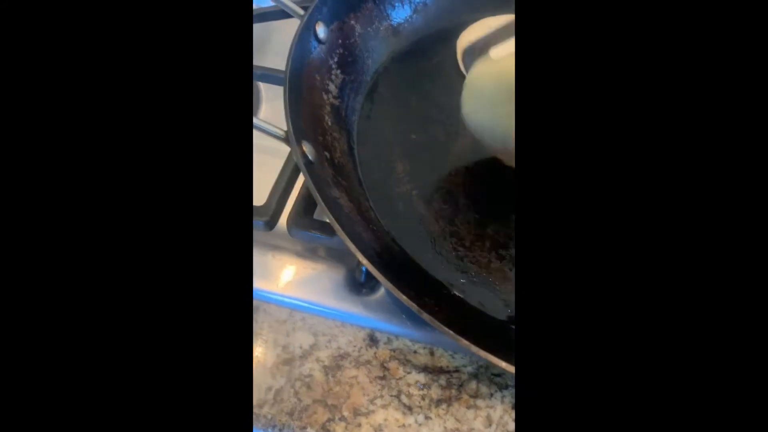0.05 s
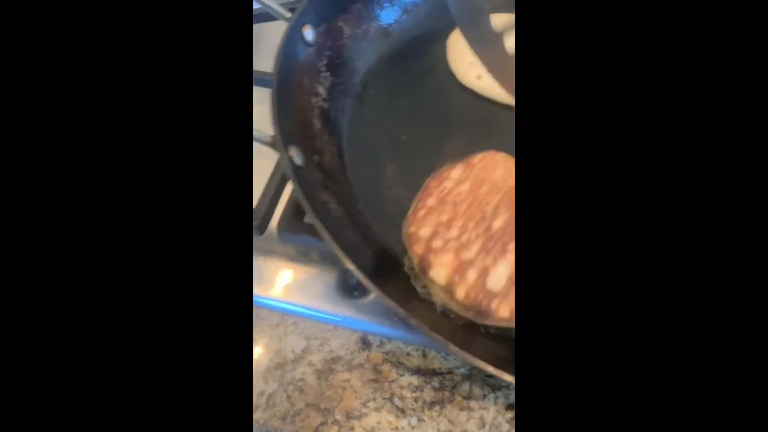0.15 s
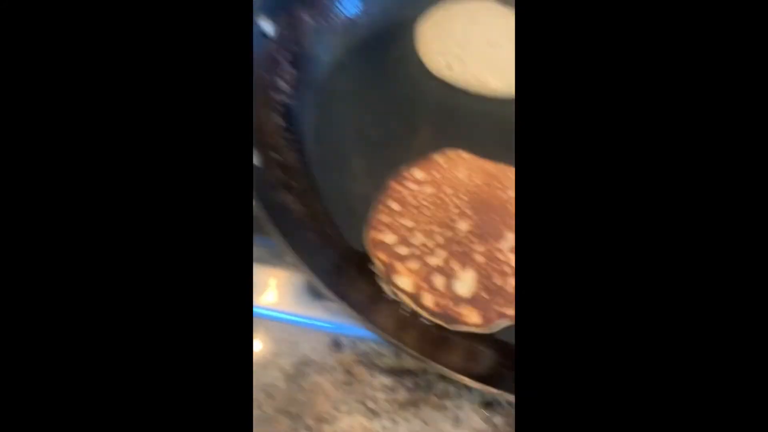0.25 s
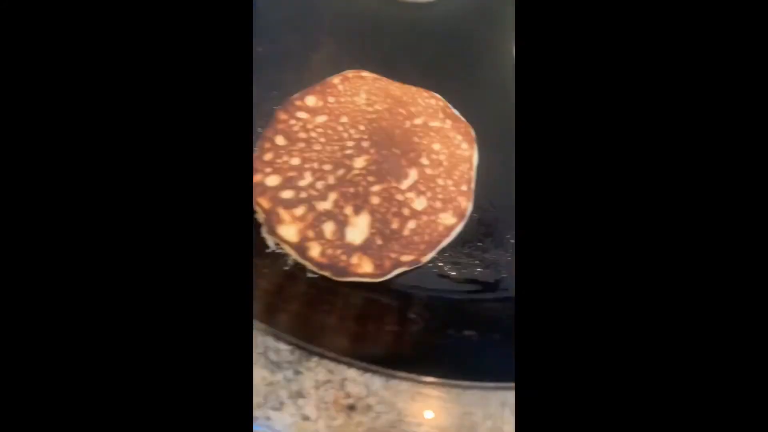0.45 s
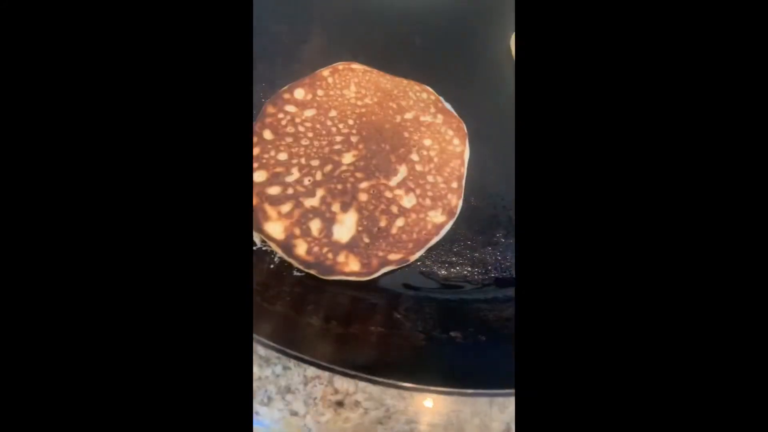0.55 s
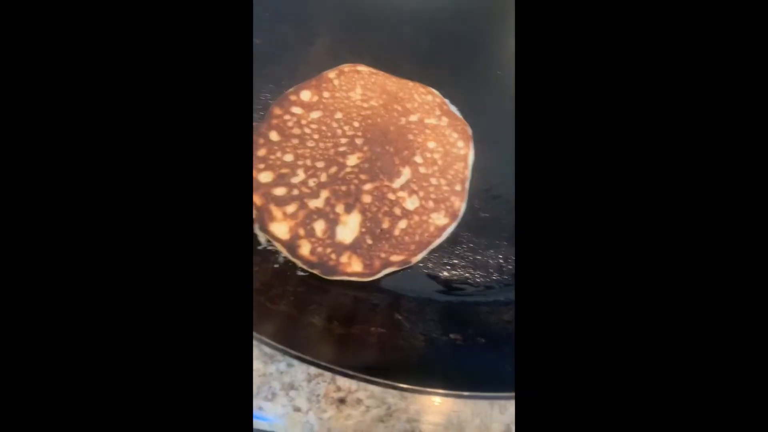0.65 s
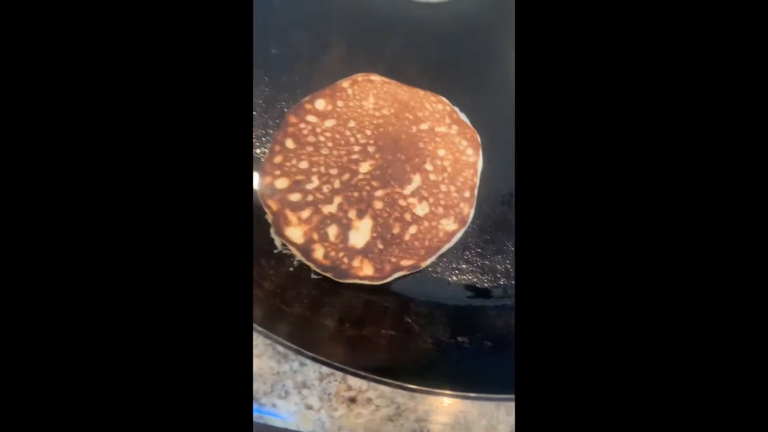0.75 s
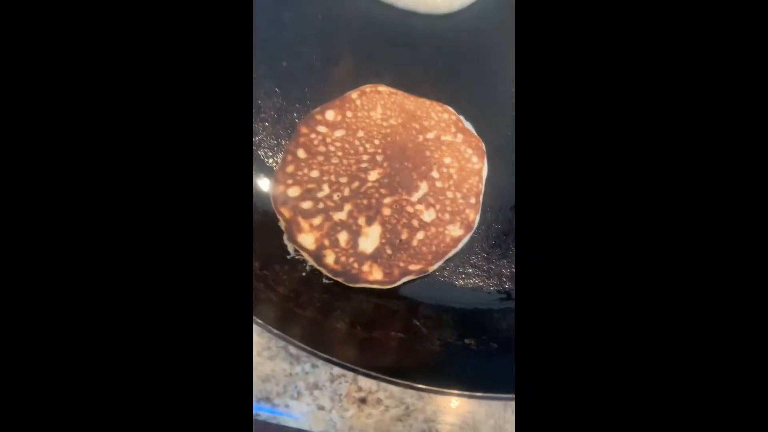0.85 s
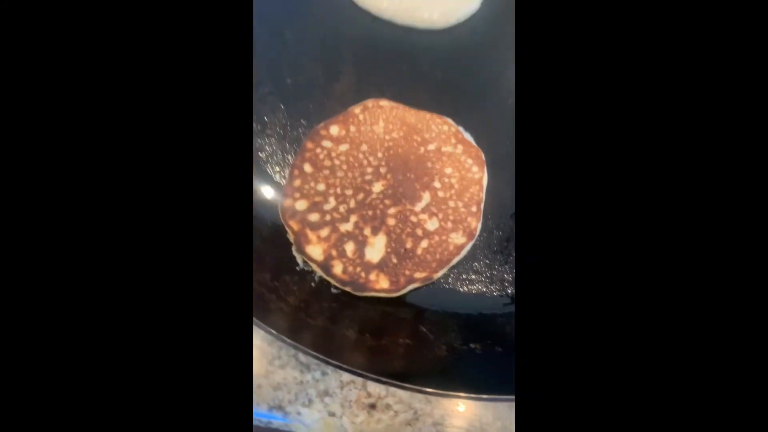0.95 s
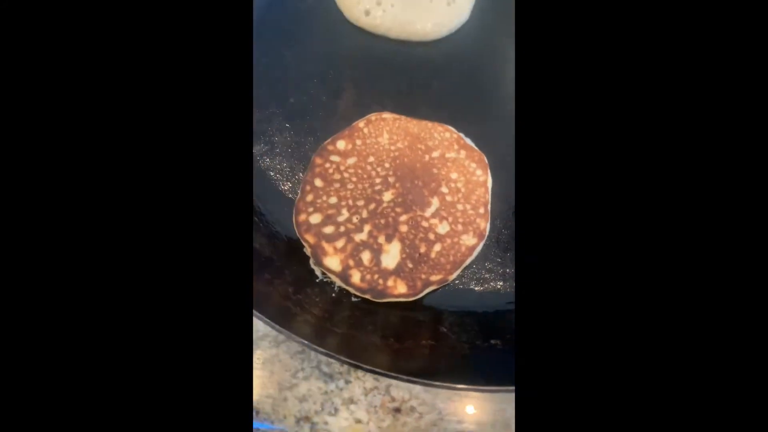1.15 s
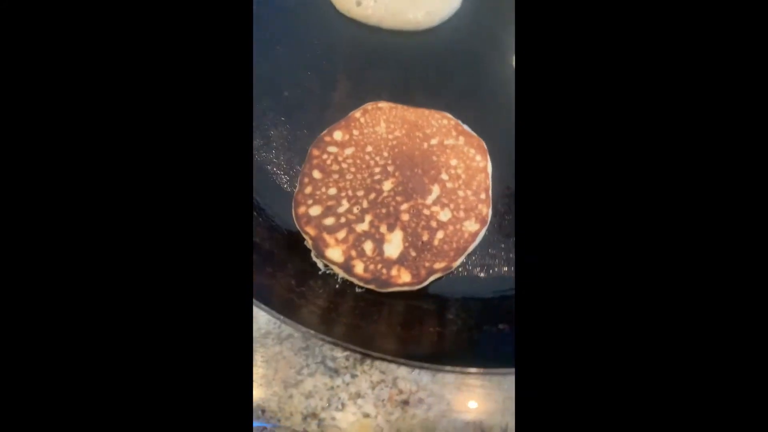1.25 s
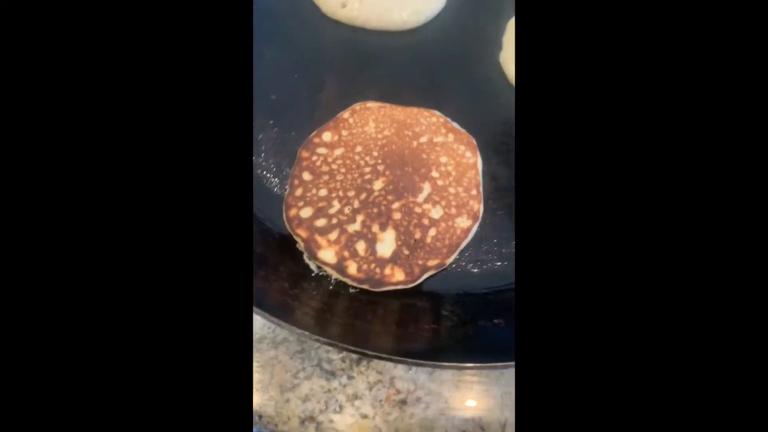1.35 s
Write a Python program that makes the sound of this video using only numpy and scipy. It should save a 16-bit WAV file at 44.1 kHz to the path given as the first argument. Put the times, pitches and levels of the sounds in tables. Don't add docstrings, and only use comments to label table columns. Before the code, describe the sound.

A spatula clacks sharply on a steel pan as a pancake flips and softly lands, fat sizzling

```python
import sys
import numpy as np
from scipy import signal
from scipy.fft import rfft, irfft
from scipy.io import wavfile
from scipy.ndimage import uniform_filter1d

SR = 44100
rng = np.random.default_rng(int(sys.argv[2]) if len(sys.argv) > 2 else 0)


def waveform_to_disk(signal):
    frames = np.transpose(np.atleast_2d(signal))
    scaled = np.clip(frames, -1, 1) * 32767
    samples = np.round(scaled).astype(np.int16)
    wavfile.write(sys.argv[1], SR, samples)


def level_to_linear(level):
    exponent = np.asarray(level, float) / 20
    return 10 ** exponent


N = 61739
T = np.arange(N) / SR
HZ = np.fft.rfftfreq(N, 1 / SR)
BLOW_S = .2472


def evened(x):
    return x / np.sqrt(np.mean(x ** 2) + 1e-20)


def read(points, hz):
    f, value = np.transpose(points)
    return np.interp(np.log(hz + 1), np.log(f + 1), value)


def curve(rows):
    return np.interp(T, *np.transpose(rows))


def add(mix, s, sound):
    part = mix[round(s * SR):][:len(sound)]
    part += sound[:len(part)]


def resonate(x, hz, width_hz):
    r = np.exp(-np.pi * width_hz / SR)
    pole = r * np.exp(2j * np.pi * hz / SR)
    return 2 * signal.lfilter([1 - r], [1, -pole], x).real


def highpass(x, hz):
    return signal.sosfilt(signal.butter(2, hz, "high", fs=SR, output="sos"), x)


def coloured(x, gain):
    return irfft(rfft(x) * gain, len(x))


def clicks(per_s, spread_db):
    size = level_to_linear(spread_db * np.minimum(rng.exponential(1, N), 4))
    sign = rng.choice([-1., 1.], N)
    return size * sign * (rng.random(N) < per_s / SR)


# frequency in Hz, level in dB per Hz.
AIR = [(20, -3.5), (60, -1.5), (100, -5), (170, -9), (480, -14), (800, -19.5), (1500, -22), (4000, -29.5)]
AIR_DB, HUM_DB = -55.5, -60
HUM_HZ, HUM_WIDTH_HZ = 122.4, 10.2


def kitchen():
    air = coloured(rng.standard_normal(N), level_to_linear(read(AIR, HZ)) * (HZ < 6000))
    waver = evened(resonate(rng.standard_normal(N), HUM_HZ, HUM_WIDTH_HZ))
    hum = np.sin(2 * np.pi * HUM_HZ * T) + 0.83 * waver
    return level_to_linear(AIR_DB) * evened(air), level_to_linear(HUM_DB) * hum


WALL_DB, WALL_T60_S = -19.5, 0.31


def walls(x):
    t = np.arange(6000) / SR
    tail = rng.standard_normal(6000) * level_to_linear(-60 * t / WALL_T60_S) * (t > .004)
    return level_to_linear(WALL_DB) * signal.oaconvolve(x, tail / np.linalg.norm(tail))[:N]


# time in seconds, level in dB.
SIZZLE = [(0, -57), (.05, -57.5), (.095, -58), (.13, -52.5), (.17, -45.5), (.195, -45), (.224, -46),
          (.24, -34), (.27, -39), (.34, -42.5), (.43, -42.5), (.47, -44.5), (.535, -43.5), (.58, -47),
          (.622, -45), (.66, -48), (.95, -51), (1.4, -52)]
# frequency in Hz, level in dB per Hz.
FIZZ = [(1200, -21), (3000, -15.5), (5000, -10), (6800, -7), (8600, -1.5), (12500, 1.5), (14500, -2),
        (16000, -0.5)]
FIZZ_OVER_DB, FIZZ_PER_S, FIZZ_SPREAD_DB, HISS_SHARE = 4.5, 700, 5, .66


def sizzle():
    hiss = rng.standard_normal(N)
    bubbles = evened(clicks(FIZZ_PER_S, FIZZ_SPREAD_DB))
    drive = HISS_SHARE * hiss + (1 - HISS_SHARE) * bubbles
    flutter = evened(uniform_filter1d(rng.standard_normal(N), 500))
    fizz = evened(coloured(drive, level_to_linear(read(FIZZ, HZ))))
    return level_to_linear(curve(SIZZLE) + FIZZ_OVER_DB + 1.3 * flutter) * fizz


# start in seconds, peak level in dB.
SPITS = [(.0045, -35), (.0285, -32), (.0315, -31), (.0595, -37), (.0672, -22.5), (.1535, -29), (.167, -28),
         (.532, -25), (.613, -25.5), (.623, -28), (.74, -20), (.8803, -24), (.8955, -27), (.8997, -29),
         (.9132, -24), (.922, -27), (.9266, -26), (.9476, -33), (.9837, -31), (.998, -29), (1.0056, -31),
         (1.0276, -25), (1.0465, -32), (1.0542, -28), (1.0945, -27.5), (1.13, -41), (1.155, -39),
         (1.2175, -32), (1.2275, -24.5), (1.3615, -30)]
SPIT_S, SPIT_TAIL_S, SPIT_TAIL_DB = 0.00019, 0.002, -11.5


def spits():
    out, t = np.zeros(N), np.arange(300) / SR
    gain = level_to_linear(read(FIZZ, np.fft.rfftfreq(300, 1 / SR)))
    lead = 20
    for (s, db), noise in zip(SPITS, rng.standard_normal((len(SPITS), 300))):
        tick = np.sign(noise) * np.exp(-t / SPIT_S)
        spray = level_to_linear(SPIT_TAIL_DB) * noise * np.exp(-t / SPIT_TAIL_S)
        pop = coloured(np.roll(tick + spray, lead), gain)
        add(out, s - lead / SR, level_to_linear(db) * pop / abs(pop).max())
    return out


# time in seconds, rumble level in dB.
ROCK = [(.24, -58), (.268, -35.5), (.3, -32.5), (.34, -36), (.46, -40), (.586, -39.5), (.675, -43.5),
        (.71, -49.5), (.8, -57), (.92, -57.5), (.986, -82), (1.04, -52), (1.1, -56.5), (1.15, -67.5)]
# frequency in Hz, width in Hz, level in dB.
GRATE = [(42.6, 32, -2), (93.3, 37.5, 1), (154, 24, 1.5), (266.4, 40, -7), (393, 43, -4.5), (534.6, 72, -6),
         (720, 132, -6.5), (1081, 153, -7.5)]
BUMPS_PER_S, BUMP_SPREAD_DB, RATTLE_GROWTH = 700, 2, 1.21
RATTLE_FADE_DB_PER_S_KHZ = 20


def rocking():
    bumps = clicks(BUMPS_PER_S, BUMP_SPREAD_DB)
    still = (T < ROCK[0][0]) | (T > ROCK[-1][0])
    db = np.where(still, -90, curve(ROCK))
    top, out = db.max(), np.zeros(N)
    for hz, width_hz, level_db in GRATE:
        growth = RATTLE_GROWTH if hz > 220 else 1
        mode = evened(resonate(resonate(bumps, hz, width_hz), hz, 2 * width_hz))
        fade_db = RATTLE_FADE_DB_PER_S_KHZ * (T - BLOW_S) * hz / 1000
        out += level_to_linear(top - 4 + level_db + growth * (db - top) - fade_db) * mode
    return out


# start in seconds, level in dB, tone in Hz, 60 dB decay in seconds.
KNOCKS = [(.259, -28.5, 1014, 0.072), (.271, -25, 402, 0.032), (.290, -23, 897, 0.034),
          (.300, -24.5, 365, 0.058), (.324, -40, 1150, .03), (.362, -45.5, 1120, 0.12),
          (.403, -42, 737, 0.058), (.412, -46.5, 1893, 0.066), (.452, -44.5, 1083, 0.16),
          (.502, -40.5, 520, 0.055), (.545, -40.5, 720, 0.065), (.618, -44, 500, 0.052),
          (.795, -50.5, 820, 0.13), (.797, -48, 2190, 0.074), (.822, -52.5, 1310, .04),
          (.993, -44.5, 606, 0.032), (1.026, -51, 794, 0.071), (1.035, -57, 1780, 0.064),
          (.001, -53.5, 740, 0.18), (.002, -52, 1600, 0.23)]


def knocks():
    out, t = np.zeros(N), np.arange(6000) / SR
    for (s, db, hz, t60), noise in zip(KNOCKS, rng.standard_normal((len(KNOCKS), 6000))):
        puff = evened(resonate(resonate(noise, hz, .5 * hz), hz, hz))
        tone = .5 * np.sin(2 * np.pi * hz * t) + puff
        onset = np.minimum(t / 0.0029, 1)
        add(out, s, level_to_linear(db - 60 * t / t60) * onset * tone)
    return out


# time in seconds, level in dB.
SCRAPE = [
    (.17, -90),
    (.195, -48),
    (.215, -46.5),
    (.228, -43.5),
    (.24, -44),
    (.244, -42),
    (.262, -47),
    (.33, -48.5),
    (.42, -53.5),
    (.5, -61.5),
]


def scrape():
    grit = clicks(2500, 3)
    return level_to_linear(curve(SCRAPE)) * evened(resonate(grit, hz=2640, width_hz=4300))


# start in seconds, level in dB, tone in Hz.
CHATTER = [
    (.2418, -16, 5030),
    (0.2452, -7, 2460),
    (0.2459, -0.5, 4320),
    (.2474, 0.5, 4700),
    (.2485, -3, 7300),
    (.2491, -1.5, 8950),
    (.2496, -3, 10300),
    (.2556, -21, 8900),
]
# frequency in Hz, level in dB, 60 dB decay in seconds.
PAN = [(328, -26, 0.049), (557, -18.5, 0.034), (1081, -22, 0.039), (1740, -30.5, 0.017),
       (2398, -21.5, 0.029), (2937, -23.5, 0.025), (3740, -28.5, 0.011), (6560, -20, 0.0063),
       (10500, -13.5, 0.006)]
CLICK_CYCLES = 1
RASP_DB, RASP_AT_S, RASP_RISE_S, RASP_FALL_S = -14, .2495, 0.0048, 0.00061


def clack():
    edge, blows, t = np.zeros(N), np.zeros(N), np.arange(4000) / SR
    for s, db, hz in CHATTER:
        add(edge, s, level_to_linear(db) * np.sin(2 * np.pi * hz * t) * np.exp(-t * hz / CLICK_CYCLES))
        blows[round(s * SR)] = level_to_linear(db)
    u = T - RASP_AT_S
    swell = np.exp(-np.maximum(-u / RASP_RISE_S, u / RASP_FALL_S))
    edge += level_to_linear(RASP_DB) * swell * rng.standard_normal(N)
    edge = highpass(edge, 1500)
    modes = [level_to_linear(db - 60 * t / t60) * np.sin(2 * np.pi * hz * t) for hz, db, t60 in PAN]
    add(edge, BLOW_S, sum(modes[:3]))
    return edge + signal.oaconvolve(blows, sum(modes[3:]))[:N]


# frequency in Hz, lead of the left in radians.
LEAD = [(0, 0), (160, -0.5), (300, -0.4), (620, -0.8), (1200, 0.57), (3600, 1.3761), (4950, 3.5),
        (9050, 9.5), (15400, 19), (22050, 35)]


def later(spectrum):
    return irfft(spectrum * np.exp(-1j * np.interp(HZ, *np.transpose(LEAD))), N)


# frequency in Hz, likeness from 0 to 1.
SAME = [(60, .9995), (150, 1), (330, 0.85), (600, 0.29), (1800, .85), (3000, 0.4), (5000, .92),
        (16000, .94)]


def ports(near, far):
    same = np.clip(read(SAME, HZ), 0, 1)
    return np.array([near, later(same * rfft(near) + np.sqrt(1 - same ** 2) * rfft(far))])


def scene():
    hits = highpass(clack() + knocks() + spits(), 230)
    air, hum = kitchen()
    other_air = kitchen()[0]
    near = air + hum + rocking() + sizzle() + scrape() + walls(hits)
    far = other_air + rocking() + sizzle() + scrape() + walls(hits)
    return ports(near, far) + np.array([hits, later(rfft(hits))])


WEAK_DB, SUDDEN_DB, JOINT_FROM_HZ = -6, 10.5, 1390


def joint(dry):
    hz, t, z = signal.stft([dry[0] + dry[1], dry[0] - dry[1]], SR, nperseg=1024)
    power = uniform_filter1d(abs(z) ** 2, size=3, axis=2)
    power = uniform_filter1d(power, size=12, axis=1)
    power = np.repeat(power[:, 6::12], 12, axis=1)[:, np.minimum(np.arange(513), 511)]
    bright = uniform_filter1d(np.diff(dry[0], prepend=0) ** 2, size=24)
    jump = bright / uniform_filter1d(bright, size=1025)
    sudden = uniform_filter1d(1. * (jump > level_to_linear(2 * SUDDEN_DB)), size=1100)
    calm = np.interp(t, T, sudden) < 1e-6
    weak = (power < level_to_linear(2 * WEAK_DB) * power[::-1]) & calm & (hz > JOINT_FROM_HZ)[:, None]
    mid, side = signal.istft(z * ~weak, SR, nperseg=1024)[1][:, :N] / 2
    return np.array([mid + side, mid - side])


def top_cut(x):
    return signal.sosfilt(signal.butter(12, 16890, fs=SR, output="sos"), x)


def record(dry):
    lowpass = signal.firwin(511, 15900, window=("kaiser", 12), fs=SR)
    mix = signal.oaconvolve(joint(dry), lowpass[None], "same")
    return top_cut(mix)


dry = scene()
out = record(dry)
waveform_to_disk(out)
```